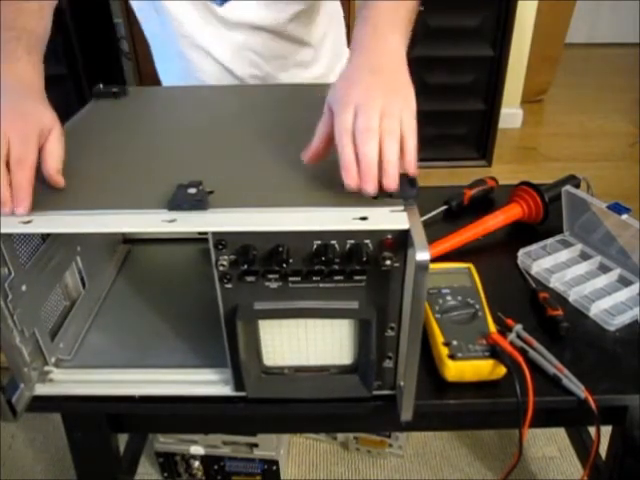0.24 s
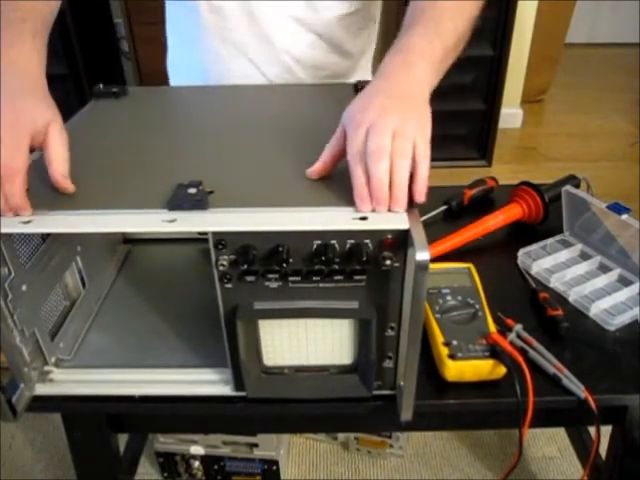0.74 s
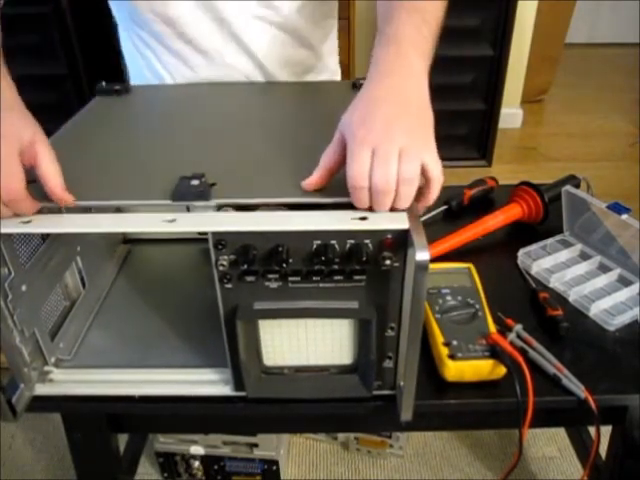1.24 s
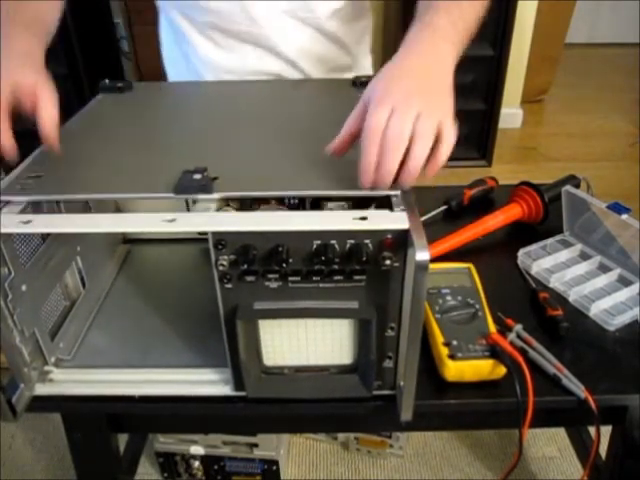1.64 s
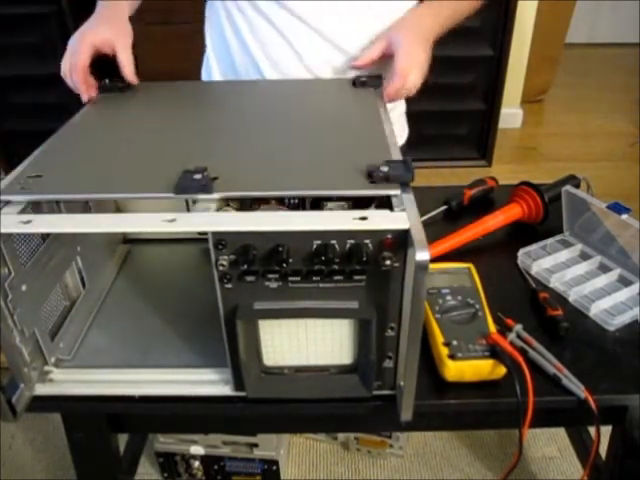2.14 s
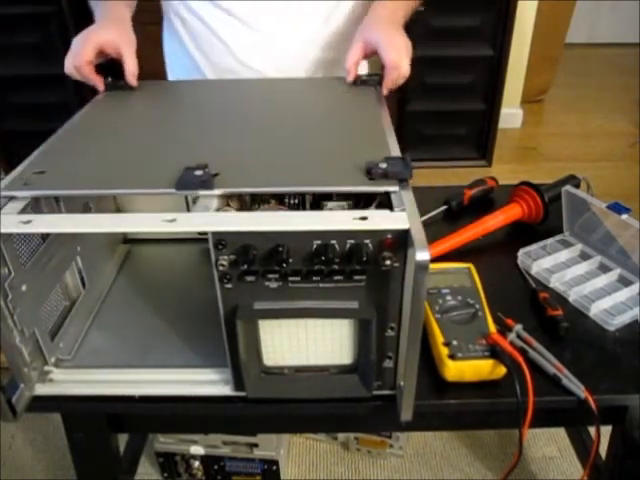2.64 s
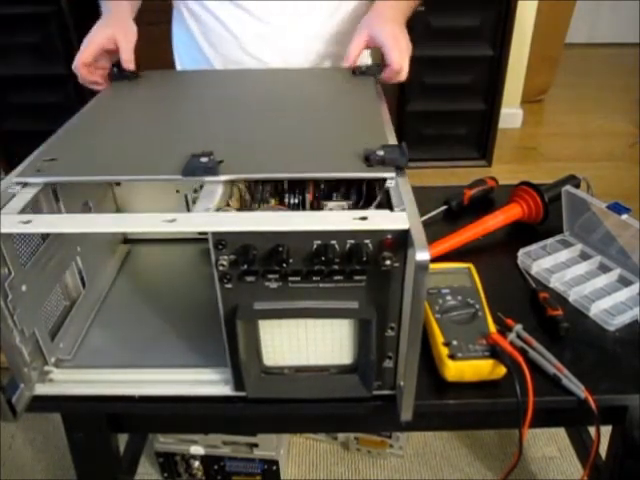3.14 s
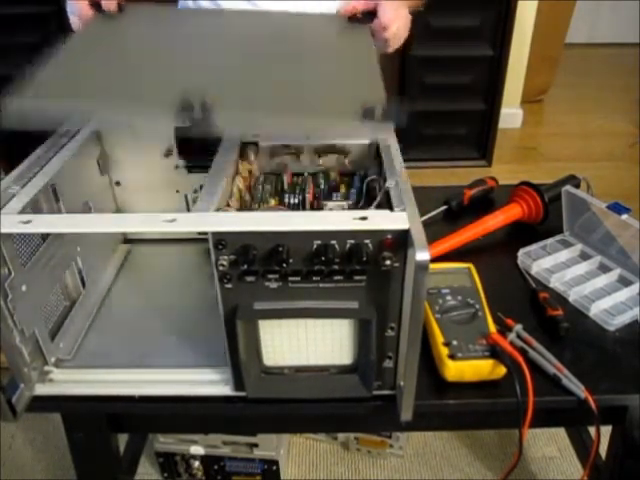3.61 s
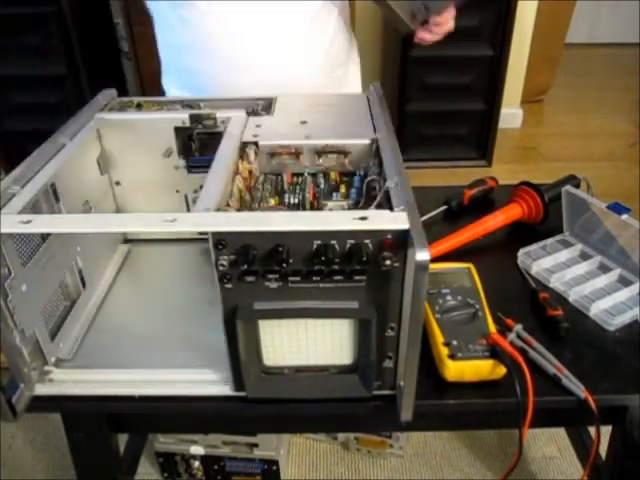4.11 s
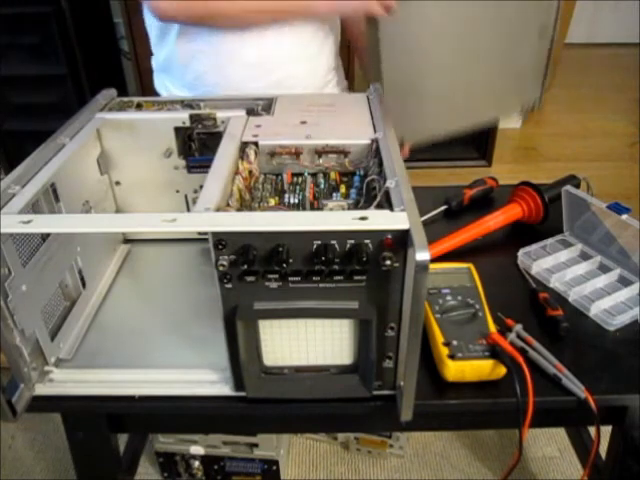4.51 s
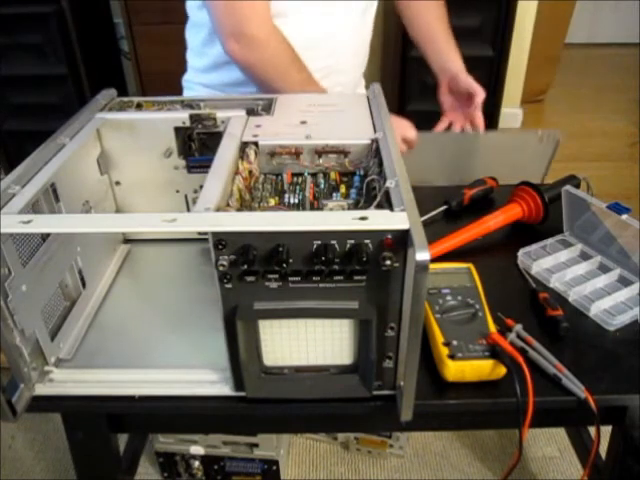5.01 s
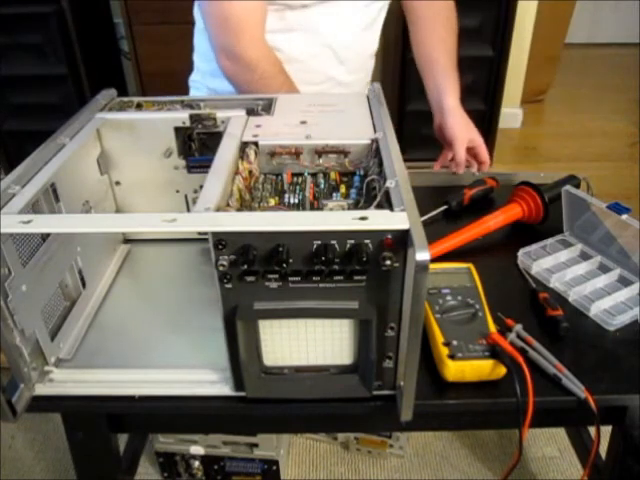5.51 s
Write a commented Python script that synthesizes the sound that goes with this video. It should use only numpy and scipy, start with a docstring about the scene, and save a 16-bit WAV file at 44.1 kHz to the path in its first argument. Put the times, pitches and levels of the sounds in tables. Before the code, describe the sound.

A stiff sheet-metal cover is knocked, scraped in harsh jerks along metal rails, pulled free with boomy clanks, then set down faintly indoors.

```python
"""On the bench of a small room, a stiff sheet-metal cover is pushed in jerks along the rails of an
instrument chassis, lifted off and put down. Slips of grit shake damped sheet modes and rasp and hiss directly;
catches knock: blows on the ringing modes, with noise bursts for clack and tick. The bench thuds in three modes.
Decaying noise makes the room's echoes; one microphone hears it all over shaped noise and two faint hums."""
import sys
import numpy as np
from scipy import signal
from scipy.fft import rfft, irfft, next_fast_len
from scipy.io import wavfile
from scipy.ndimage import uniform_filter1d

SR = 44100
rng = np.random.default_rng(int(sys.argv[2]) if len(sys.argv) > 2 else 0)


def output_pcm(signal):
    """Save a mono or channel-first signal as 16-bit PCM at the path in sys.argv[1].

    Samples are clipped to [-1, 1] before scaling.
    """
    pcm = np.clip(np.atleast_2d(signal).T, -1, 1) * 32767
    wavfile.write(sys.argv[1], SR, np.round(pcm).astype(np.int16))


N = 254016
RING = SR // 3   # samples that one blow lasts

# spectrum of the coarse rasp and the clacks: (frequency [Hz], relative level per Hz [dB])
RASP_SPECTRUM = [(1060, -16), (1800, 1.5), (2630, 1.5), (2950, 0.5), (3830, -4), (5400, -5), (5930, -10),
                 (8000, -8), (10400, -41), (17600, -120)]
# spectrum of the fine grit hiss and the ticks: (frequency [Hz], relative level per Hz [dB])
HISS_SPECTRUM = [(2940, -12), (5000, -5), (6170, -6), (7530, -5), (8850, -3), (10300, 2.5), (11000, -2),
                 (11700, -2), (12400, -7), (14100, -14), (15600, -25)]


def from_db(db):
    """Gain of a level in dB."""
    return 10 ** (np.asarray(db) / 20)


def rms_one(x):
    """Scaled to rms 1."""
    return x / np.sqrt(np.mean(x ** 2) + 1e-20)


def at_hz(points, hz, axis=1):
    """A column of a table read on a log-frequency axis."""
    points = np.array(points)
    return np.interp(np.log(hz), np.log(points[:, 0]), points[:, axis])


def coloured(x, spectrum):
    """x through a spectrum in dB per Hz."""
    size = next_fast_len(len(x))
    hz = np.maximum(np.arange(size // 2 + 1) * SR / size, 1)
    gain = from_db(at_hz(spectrum, hz))
    return irfft(rfft(x, size) * gain, size)[:len(x)]


def dying(t60, count):
    """Falls 60 dB in t60 seconds."""
    return from_db(-60 * np.arange(count) / SR / np.asarray(t60)[..., None])


def ringing_sines(hz):
    """One undamped sine per mode, starting at zero as a struck mode does."""
    return np.sin(2 * np.pi * hz[:, None] * np.arange(RING) / SR)


def drift(per_s):
    """Slow chance, spread 1."""
    size = round(SR / per_s)
    smooth = uniform_filter1d(rng.standard_normal(N), size=size)
    return rms_one(uniform_filter1d(smooth, size=size))


def background():
    """Room tone and microphone hiss as shaped noise, with faint wavering hums."""
    # noise of room and microphone: (frequency [Hz], relative level per Hz [dB])
    floor_spectrum = [(12, -30), (20, 1), (95, 4), (633, -1.5), (910, 1), (1020, -3), (1380, -1.5),
                      (1930, -6), (3980, -8), (10300, -11.5), (12100, -14.5), (15600, -20)]
    # tones of the room: (frequency [Hz], middle peak level [dB])
    hums = [(96, -71), (257, -67.5)]
    floor_db = -51   # rms
    out = from_db(floor_db) * rms_one(coloured(rng.standard_normal(N), floor_spectrum))
    for hz, level_db in hums:
        waver_db = 2.7 * drift(7.4)
        out += from_db(level_db + waver_db) * np.sin(2 * np.pi * hz * np.arange(N) / SR)
    return out


def sheet(count=300):
    """Pitches and ringing sines of all modes of the sheet, before the hands damp them."""
    # strongest modes of the free sheet: (frequency [Hz], relative level [dB], t60 [s])
    strong_modes = [(265.8, 1.5, 0.48), (364, -10, 0.56), (392.4, 3.5, 0.41), (439.5, 0, 0.89),
                    (555.5, 2.5, 0.38), (743, 0, 0.14), (755, -7.5, 0.18), (930, 7, 0.04), (976, 3, 0.045),
                    (1112, -4.5, 0.25), (1232, 1, 0.076), (1355, -3.5, 0.85), (1453, 5.5, 0.086),
                    (1560, 4, 0.5), (1650, -3, 0.13), (1727, 6.5, 0.035), (2030, -4.5, 0.27),
                    (2087, -7, 0.19), (2419, -8.5, 0.59), (3060, -13, .2), (4130, -24, 0.098)]
    # trend of the weaker modes between them: (frequency [Hz], relative level [dB], t60 [s])
    crowd_trend = [(81, -17, 0.38), (185, -11.5, 0.8), (480, -9.5, 0.69), (1340, -3, 0.48),
                   (2570, -9.5, 0.14), (5050, -15.5, 0.22), (9050, -22, .15)]
    crowd_hz = np.geomspace(80, 9000, count) * rng.uniform(.99, 1.01, count)
    strong_hz, strong_db, strong_t60 = np.transpose(strong_modes)
    hz = np.r_[strong_hz, crowd_hz]
    gain = from_db(np.r_[strong_db, at_hz(crowd_trend, crowd_hz)])
    t60 = np.r_[strong_t60, at_hz(crowd_trend, crowd_hz, axis=2)]
    return hz, gain[:, None] * dying(t60, RING) * ringing_sines(hz)


def meeting(count):
    """Sign and strength with which one place on the sheet meets each mode."""
    return rng.choice([-1, 1], count) * from_db(2.7 * rng.standard_normal(count))


def grit(per_s, spread_db):
    """Random slips of either sign and uneven size, the stronger ones coming in clumps; rms 1."""
    clumps = rms_one(uniform_filter1d(rng.standard_normal(N), size=SR // 150))
    unevenness = np.minimum(rng.exponential(1, N), 5)
    sizes = from_db(spread_db * unevenness + 1.56 * clumps)
    slipping = rng.random(N) < per_s / SR
    return rms_one(sizes * rng.choice([-1, 1], N) * slipping)


def stroke_levels():
    """Levels in dB of sheet, upper modes, rasp and hiss: every stroke swells and fades above the resting hands."""
    # strokes of the cover along the rails and of the hands over it: (time of the top [s], rise [s], fall [s],
    # sheet level [dB], its upper modes relative to that [dB], rasp level [dB], fine hiss level [dB])
    strokes = [(.13, 0.27, .3, -72, -17, -57, -59), (.232, 0.07, 0.14, -47.5, 0.5, -48, -68),
               (.36, 0.23, 0.54, -45, -6.5, -56, -57.5), (.646, 0.3, 0.28, -54, -23, -51.5, -63),
               (0.872, 0.058, 0.088, -29, -11, -28.5, -39.5), (1.018, 0.024, .08, -33, -6, -42, -29),
               (1.047, 0.036, 0.041, -25.5, 4, -28, -19.5), (1.118, .15, 0.079, -24, 1.5, -34.5, -28),
               (1.371, 0.068, .05, -35, -6, -37.5, -42), (1.465, 0.089, .14, -36, 0, -38, -32),
               (1.8, 0.23, 0.74, -57, -14, -57, -58.5), (2.118, .04, 0.033, -52, -20, -64, -75),
               (2.234, 0.037, .08, -54, -14, -57, -68), (2.497, 0.045, 0.19, -47, -4, -51, -42.5),
               (2.61, 0.028, 0.075, -26.5, -6, -42, -29.5), (2.659, 0.071, 0.076, -26.5, -3, -32, -37),
               (2.797, 0.095, 0.18, -29.5, -7, -34, -28), (2.871, 0.11, 0.09, -22, 0.5, -23.5, -49),
               (3.031, 0.038, 0.078, -28, -3, -32, -28), (3.274, 0.14, 0.096, -33, 4, -36.5, -28.5),
               (3.414, 0.07, 0.088, -40.5, 1.5, -54, -41.5), (3.914, 0.036, .12, -62, -5, -61, -56),
               (4.166, 0.043, .12, -53, -11, -51, -55.5), (4.284, 0.16, 0.08, -57, 9, -51.5, -55),
               (4.61, 0.17, 0.09, -49, -2.5, -49, -50.5), (4.748, 0.074, 0.12, -47.5, -18, -47, -43),
               (4.93, 0.21, 0.25, -56, -14, -60, -68), (5.105, 0.023, 0.22, -57, 2, -53, -49),
               (5.378, 0.033, 0.2, -48, -18, -49, -49.5), (5.73, 0.65, 0.17, -57, -8, -61, -57.5)]
    # how steeply the levels follow the swell: one factor each for sheet, upper modes, rasp, hiss
    follows = [.8, .9, 1.1, 1.15]
    # while the hands only hold the cover: level [dB] of sheet, upper modes, rasp, hiss
    resting_db = [-62.5, -64, -64.5, -73.5]
    swell_range_db = 20   # swell over one rise or fall time, before the follow factors
    roundness = 1.09      # above 1 the top of a stroke is round, its ends are steep
    power = np.tile(from_db(resting_db)[:, None] ** 2, (1, N))
    for s, rise_s, fall_s, sheet_db, upper_db, rasp_db, hiss_db in strokes:
        late = np.arange(N) / SR - s
        distance = np.maximum(-late / rise_s, late / fall_s)
        swell_db = -swell_range_db * distance ** roundness
        peaks = from_db([sheet_db, sheet_db + upper_db, rasp_db, hiss_db])
        near = swell_db > -4 * swell_range_db
        power[:, near] += (peaks[:, None] * from_db(np.outer(follows, swell_db[near]))) ** 2
    return 10 * np.log10(power)


def rail_song(slips):
    """Narrow resonances of the rail lips, each swelling and fading on its own as the contact moves."""
    # the rail lips sing: (frequency [Hz], bandwidth [Hz], middle relative level [dB])
    rail_modes = [(5200, 160, 4), (7730, 180, -12), (8150, 200, -4), (8600, 200, 7), (9100, 190, 5),
                  (11470, 190, 8), (11600, 260, -18), (12400, 220, -10.5)]
    out = 0
    for hz, width_hz, level_db in rail_modes:
        b, a = signal.iirpeak(hz, hz / width_hz, SR)
        swell = from_db(level_db + 5 * drift(10))
        out = out + swell * rms_one(signal.lfilter(b, a, slips))
    return rms_one(out)


def rubbing(hz, rings):
    """Slips in the rails shake the hand-damped sheet; finer grit is heard directly as rasp and hiss."""
    split_hz = 1430     # where the upper modes take over
    rub_low_hz = 398    # fine slips are too quick to move the slow modes
    rail_db = -12.5     # rail song relative to the fine hiss
    sheet_db, upper_db, rasp_db, hiss_db = stroke_levels()
    slips = grit(2500, spread_db=2.5)
    upper = 1 / (1 + (split_hz / hz) ** 4)
    lower = (1 - upper) / (1 + (rub_low_hz / hz) ** 2)
    rings = rings[:, :RING // 2] * dying(0.17, RING // 2)   # extra damping by the hands
    step = SR // 14
    fade = np.sqrt(np.hanning(2 * step))
    boom = np.zeros(N + RING)
    for at in range(0, N - step, step):   # the contact wanders and meets the modes anew
        for share, level_db in ((lower, sheet_db), (upper, upper_db)):
            response = (meeting(len(hz)) * share) @ rings
            drive = from_db(level_db[at:at + 2 * step]) * slips[at:at + 2 * step]
            part = signal.fftconvolve(drive * fade[:len(drive)], response)
            boom[at:at + len(part)] += part / np.sqrt(np.sum(response ** 2))
    rasp = from_db(rasp_db) * rms_one(coloured(grit(4000, spread_db=3), RASP_SPECTRUM))
    fine = grit(6500, spread_db=0.0)
    fine_hiss = rms_one(coloured(fine, HISS_SPECTRUM))
    hiss = from_db(hiss_db) * (fine_hiss + from_db(rail_db) * rail_song(fine))
    return boom[:N] + rasp + hiss


def chatter(count=5):
    """The loose sheet touches again a few times within some hundredths of a second."""
    touches = np.zeros(RING)
    touches[0] = 1
    touch_at = (rng.uniform(.004, .04, count) * SR).astype(int)
    touches[touch_at] = 0.31 * rng.uniform(-0.99, 1, count)
    return touches


def snap(spectrum, t60):
    """A short noise burst with a weak, longer tail, rms 1 at its start."""
    envelope = dying(t60, RING) + 0.26 * dying(0.18, RING)
    burst = coloured(rng.standard_normal(RING), spectrum) * envelope
    return burst / burst[:150].std()


def knocks(hz, rings):
    """Each knock favours the modes near its own pitch; the hands damp the ring."""
    # knocks on the sheet: (time [s], peak level of the boom [dB], pitch [Hz], width [octaves],
    # clack level at its start [dB], tick level at its start [dB])
    blows = [(.176, -36, 885, .54, -65, -63), (0.208, -28, 1090, 2.8, -44.5, -59),
             (.276, -25, 870, 0.53, -45, -61), (.304, -32, 950, .65, -51, -48),
             (.433, -23.5, 470, 0.68, -37.5, -45), (.574, -21, 1300, 3.3, -50.5, -66),
             (.792, -34, 533, 0.55, -41.5, -47), (.831, -11, 527, 1.2, -28, -43),
             (.835, -10.5, 1080, .73, -17, -20.5), (.940, -11.5, 585, 3.1, -45, -38),
             (1.011, -19.5, 1800, .8, -30.5, -28), (1.033, -19, 1600, 1.2, -29, -24),
             (1.041, -14, 900, 1.3, -23, -12.5), (1.050, -44, 1500, .9, -34, -18),
             (1.056, -35, 1200, .82, -35, -19), (1.354, -20.5, 1040, 0.81, -27.5, -26),
             (2.128, -46, 1180, 0.1, -53, -63), (2.225, -45, 503, 0.82, -51, -48),
             (2.558, -15, 740, 1.8, -39, -40), (2.619, -8.5, 710, 1.2, -17.5, -24),
             (2.68, -35, 1260, 0.74, -31, -24), (2.798, -13.5, 2570, 0.21, -18.5, -11.5),
             (2.843, -15, 2300, 0.43, -20.5, -18.5), (2.866, -8, 890, 4.5, -36, -22),
             (3.013, -26, 1166, 0.37, -41, -33), (3.177, -54, 1200, 0.87, -58, -36),
             (3.372, -15.5, 700, 1.1, -56, -49), (3.383, -32, 1520, .06, -60, -56),
             (3.393, -40, 577, 0.26, -47, -43), (4.154, -41, 1240, .76, -46, -60),
             (4.280, -39.5, 820, 0.43, -48, -60), (4.598, -36, 740, .57, -49, -55),
             (4.74, -39.5, 1530, 0.087, -61, -55), (4.872, -41.5, 594, .6, -58, -62),
             (5.095, -40.5, 1020, .5, -61, -48), (5.129, -38.5, 1540, 0.32, -54, -52),
             (5.744, -32, 710, 0.88, -41, -42.5), (5.756, -30, 1000, 0.91, -44, -42)]
    hands_t60_s = 0.39             # damping by the hands for very broad knocks
    pure_octaves = 0.12            # for knocks narrower than this, the damping time at least doubles
    punch, punch_t60_s = 0.8, 0.11   # the blow itself stands out above the ring and dies faster
    out = np.zeros(N + RING)
    for s, peak_db, pitch_hz, octaves, clack_db, tick_db in blows:
        t60 = hands_t60_s * (1 + pure_octaves / octaves)
        favour = 1 / (1 + (np.log2(hz / pitch_hz) / octaves) ** 2)
        damping = dying(t60, RING) + punch * dying(punch_t60_s, RING)
        boom = (meeting(len(hz)) * favour) @ rings * damping
        boom = boom * (1 - dying(0.0056, RING))   # the push builds over a few ms
        boom = signal.fftconvolve(boom, chatter())[:RING]
        boom = from_db(peak_db) * boom / np.abs(boom).max()
        clack = from_db(clack_db) * snap(RASP_SPECTRUM, 0.077)
        tick = from_db(tick_db) * snap(HISS_SPECTRUM, 0.011)
        at = round(s * SR)
        out[at:at + RING] += boom + clack + tick
    return out[:N]


def thuds():
    """The chassis thuds on the bench under the harder pushes; each sets the same few bench modes ringing."""
    # pushes that reach the bench: (time [s], strength of the push [dB])
    bench_pushes = [(.435, -40), (0.573, -42), (0.833, -24), (.941, -19), (1.046, -26), (1.355, -30),
                    (2.56, -32), (2.622, -26.5), (2.868, -26.5), (3.375, -40)]
    # modes of the bench: (frequency [Hz], relative level [dB], t60 [s])
    bench_modes = [(99, -10.5, 0.41), (161.5, -9.5, 0.13), (268, -8, 0.29)]
    hz, level_db, t60 = np.transpose(bench_modes)
    ring = from_db(level_db) @ (dying(t60, RING) * ringing_sines(hz))
    ring = ring * (1 - dying(0.055, RING))   # soft onset
    pushes = np.zeros(N)
    for s, push_db in bench_pushes:
        pushes[round(s * SR)] = from_db(push_db)
    return signal.fftconvolve(pushes, ring)[:N]


def room(x):
    """Dense echoes that start after the first wall and die, the treble softened."""
    t60_s, treble_cut_hz = 0.66, 14400
    echoes = rng.standard_normal(SR // 2) * dying(t60_s, SR // 2)
    echoes[:round(.006 * SR)] = 0   # the way to the first wall and back
    echoes = signal.sosfilt(signal.butter(1, treble_cut_hz, fs=SR, output="sos"), echoes)
    return signal.fftconvolve(x, echoes / np.sqrt(np.sum(echoes ** 2)))[:N]


def scene():
    """Cover, room and background, the same in both channels."""
    sheet_low_hz = 88   # the cover radiates little below this
    room_db = -14.5     # gain of the echoes relative to the direct sound
    hz, rings = sheet()
    cover = rubbing(hz, rings) + knocks(hz, rings) + thuds()
    cover = signal.sosfilt(signal.butter(2, sheet_low_hz, "high", fs=SR, output="sos"), cover)
    return np.tile(cover + from_db(room_db) * room(cover) + background(), (2, 1))


def record(dry):
    """The highest peaks are rounded, the top is cut."""
    cutoff_hz = 15750
    rounded = 1.2 * np.tanh(dry / 1.2)
    return signal.sosfilt(signal.ellip(12, .3, 80, cutoff_hz, fs=SR, output="sos"), rounded)


dry = scene()
out = record(dry)
output_pcm(out)
```